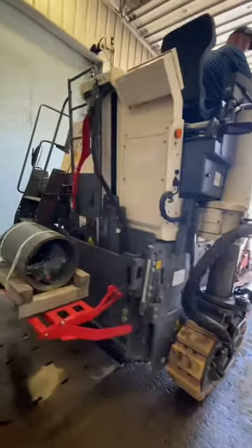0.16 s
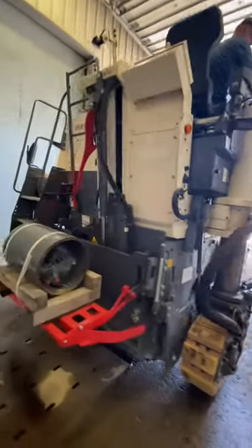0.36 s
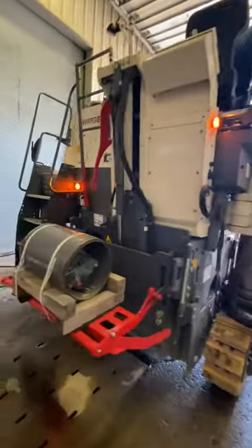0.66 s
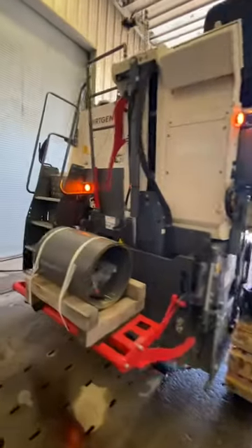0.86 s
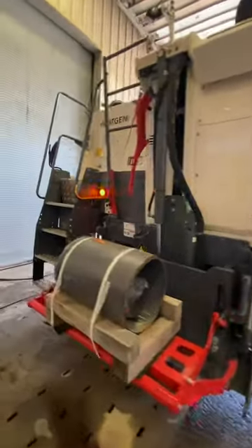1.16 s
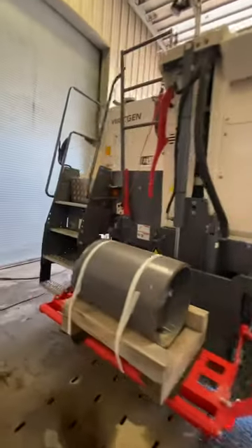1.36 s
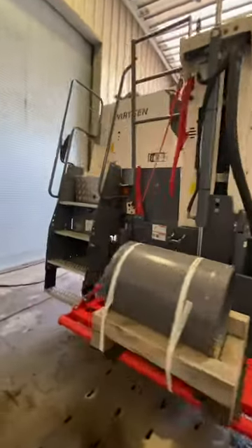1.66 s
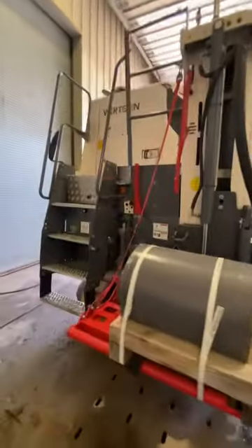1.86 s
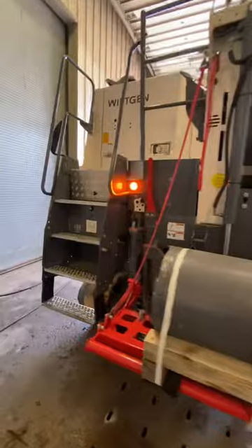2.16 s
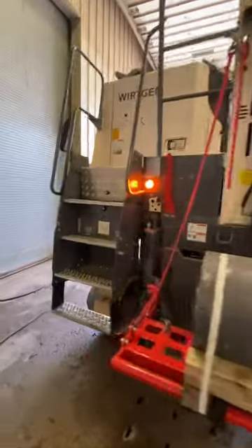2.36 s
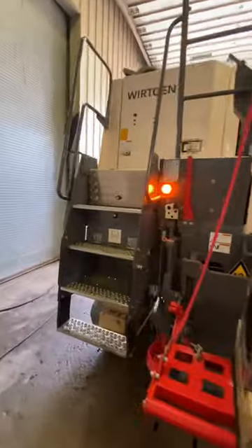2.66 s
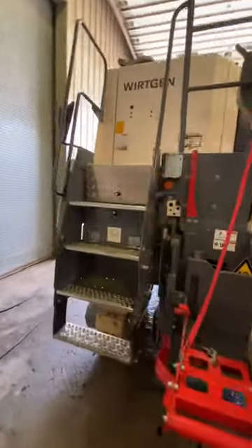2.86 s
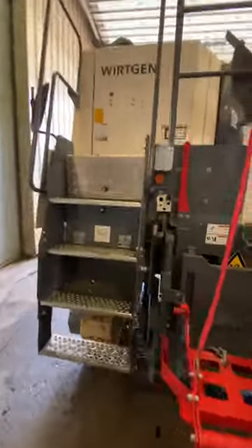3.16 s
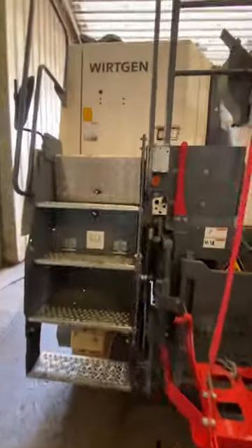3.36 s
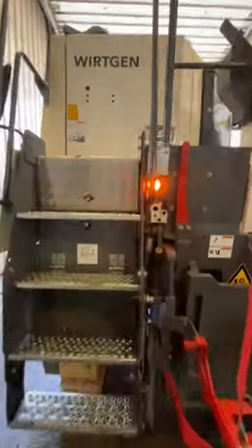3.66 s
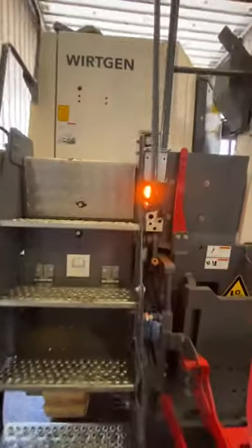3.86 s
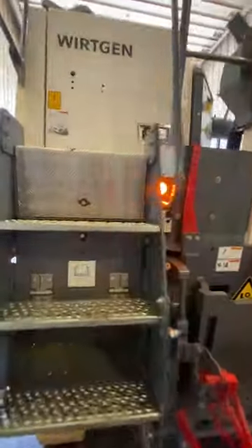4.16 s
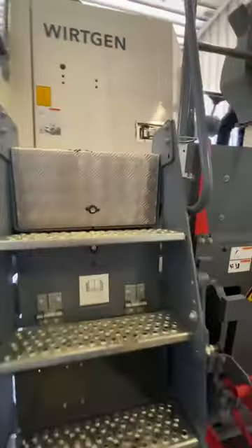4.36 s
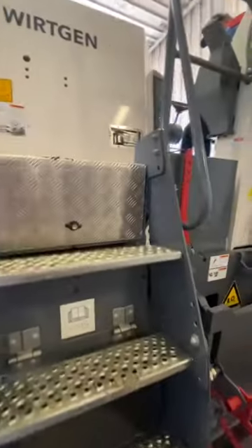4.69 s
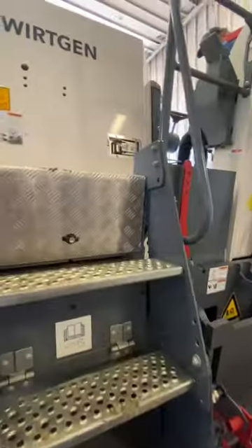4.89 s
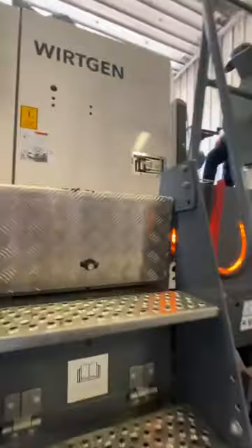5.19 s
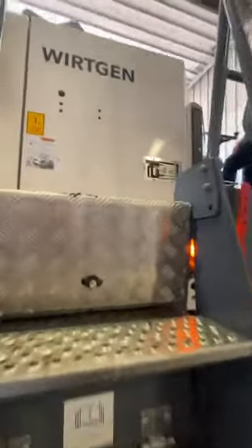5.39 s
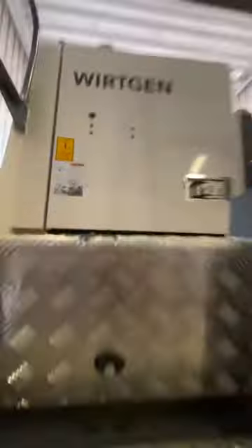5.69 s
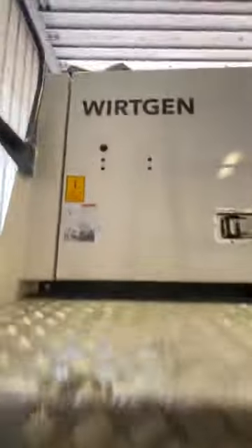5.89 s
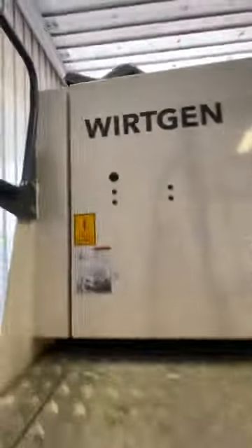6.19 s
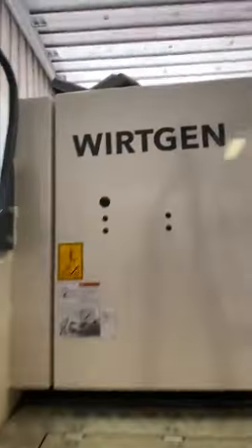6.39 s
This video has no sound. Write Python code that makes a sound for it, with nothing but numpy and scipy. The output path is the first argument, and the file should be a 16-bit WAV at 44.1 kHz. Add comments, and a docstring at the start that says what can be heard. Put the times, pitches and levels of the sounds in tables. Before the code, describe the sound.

The steady low drone of a heavy diesel machine swells as it gets closer indoors, and a metal step rattles briefly.

```python
"""A big six-cylinder diesel idles in a steel-walled bay, heard from a phone carried up close to it.
Firing, cooling-fan and hydraulic-pump tones swell and sink as the two microphones cross the bay's
standing waves. Under them is a roar of valves, injectors and air that partly repeats each engine cycle.
On the way in something ticks near the phone; later a metal step is knocked and rattles briefly."""
import sys
import numpy as np
from scipy import signal
from scipy.fft import rfft, irfft
from scipy.io import wavfile
from scipy.ndimage import uniform_filter1d

SR = 44100
rng = np.random.default_rng(int(sys.argv[2]) if len(sys.argv) > 2 else 0)


def unload_wav(signal):
    """Save mono or channel-first audio to the path in sys.argv[1] as 16-bit WAV at rate SR, clipped to [-1, 1]."""
    wavfile.write(
        sys.argv[1],
        SR,
        np.round(np.clip(np.atleast_2d(signal).T, -1, 1) * 32767).astype(np.int16),
    )


N = 288414

# gain on the way up to the machine: t/s, level/dB
APPROACH_GAIN = [(0, 0), (1.8, 1), (3, 3.5), (4.2, 5.5), (5.4, 8), (6, 9), (6.54, 9)]
# the step strikes its frame: t/s, level/dB, softness/(dB per octave)
STEP_CONTACTS = [(5.0052, 0, 2), (5.0089, -2, 0), (5.0145, -11, 0), (5.0195, -4, 8), (5.030, -11, 5),
                 (5.0355, -10, 7)]
# modes of the step: f/Hz, relative level/dB, t60/s
STEP_RESONANCES = [(2250, 0, .02), (2480, 0, .03), (2680, -4, .03), (3250, -5, .015), (3900, -6, .015),
                   (4700, -10, .025), (5400, -1, .03), (6700, -11, .025), (8600, -8, .045),
                   (10100, -22, .025)]
# mid colour of the roar as the phone records it, almost empty from 8.8 to 12 kHz,
# with a faint hiss near 14 kHz: f/Hz, relative level/dB
MID_COLOUR = [(20, -78), (64, -49.5), (105, -39.5), (240, -40), (600, -51), (1100, -50.5), (1250, -53.5),
              (2700, -59.5), (2950, -64), (3500, -68.5), (6200, -74), (8200, -86), (8800, -113),
              (12000, -113), (14000, -101)]
# side colour of the roar as the phone records it: f/Hz, relative level/dB
SIDE_COLOUR = [(20, -85.5), (45, -90.5), (100, -66.5), (210, -60), (480, -57.5), (1060, -56.5),
               (1700, -64.5), (2500, -56.5), (3500, -64), (6000, -71), (6500, -76.5), (10000, -78.5),
               (12500, -83), (15500, -111)]
# ringing enclosure panels and a null of the bay's air: f/Hz, width/Hz, lift/dB
PANEL_RESONANCES = [(130, 17, -6.5), (496, 38, 5.5), (659, 81, 2.5), (835, 120, 3.5), (1045, 45, 4.5),
                    (1500, 170, 3), (2707, 120, 4.5), (4740, 780, 0), (5960, 640, 5.5)]
# share of the side that follows the mid: f/Hz, in phase, a quarter cycle ahead
MIC_LINK = [(90, 0.41, -0.46), (220, 0.36, -0.64), (330, -0.11, -0.34), (460, -0.00013, 0.06),
            (790, 0.53, 0.04), (1330, 0.38, 0.33), (1910, 0.13, 0.78), (3500, -0.074, 0.38),
            (4500, 0.064, 0.2), (5000, -0.045, -0.2), (5500, -.2, 0.63), (7500, -.08, 0.49),
            (9000, 0.2, 0.1)]
# shares of the roar's power that repeat: f/Hz, each cycle, each third of a cycle
REPEAT_SHARES = [(60, 0.19, 0), (300, 0.2, 0.11), (1030, 0.41, 0.02), (2340, 0.1, 0.09), (2620, 0.04, 0.6),
                 (2900, 0.03, 0.08), (6000, 0.06, 0)]
# loud spots of the standing waves: t/s, f/Hz, rms level/dB before the approach gain, spread/s
LOUD_SPOTS = [(0, 325.8, -41.5, 0.61), (.12, 250.7, -34, 0.78), (1.1, 250.4, -44, 0.65),
              (.5, 116.2, -36.5, 0.25), (.9, 102, -41, 0.26), (1.64, 250, -36.5, 0.18),
              (1.64, 232, -41, 0.18), (1.71, 149.2, -35.5, 0.36), (1.93, 484.7, -45.5, 0.33),
              (2.21, 161.9, -40.5, 0.94), (2.21, 173.8, -44.5, 0.52), (1.0, 49.6, -60, .6),
              (2.8, 50.4, -53.5, 1.3), (2.45, 232, -46, 0.1), (2.82, 483, -45, 0.14),
              (3.01, 326.7, -46.5, 0.18), (3.25, 115.5, -38, 1.08), (3.3, 809, -46, 0.087),
              (3.31, 100, -45, .57), (3.74, 246, -49.5, 0.13), (3.98, 231.2, -36, 0.2),
              (3.98, 377, -48.5, 0.4), (4.06, 161, -46, 0.09), (4.32, 150, -43, .17), (4.35, 402, -42, .35),
              (4.7, 408.7, -49.5, 0.55), (5, 504.5, -51.5, 0.38), (5.2, 33.4, -71, .4),
              (4.51, 324.7, -44.5, 0.32), (4.71, 375.3, -42.5, 0.2), (5.25, 488.2, -41.5, .33),
              (5.15, 201.1, -36.5, 0.33), (5.17, 150.3, -40, 0.3), (5.2, 174.1, -36, 0.64),
              (5.38, 162.4, -40, .52), (5.3, 406.6, -45, 0.44), (5.8, 91.8, -48.5, .8),
              (5.5, 100.5, -43, 0.97), (5.61, 374.1, -36, 0.16), (5.7, 251, -49.5, 0.23),
              (5.9, 202.5, -52, 0.1), (6.46, 116.5, -32.5, 0.56)]

# orders of each source, and their mid rms level/dB from afar, between loud spots
ENGINE_ORDERS = (4, 6, 9, 12, 18, 21, 24, 30, 36, 45, 48, 49, 60)
ENGINE_DB = (-75, -60.5, -56.5, -53, -46.5, -60, -45.5, -49, -52.5, -49.5, -57.5, -60.5, -56.5)
FAN_ORDERS, FAN_DB = (3, 4, 5, 9, 10), (-58, -53.5, -39, -49, -42)
PUMP_ORDERS, PUMP_DB = (1, 2, 3, 5), (-46, -46.5, -58.5, -55)
CYCLE_HZ, FAN_SHAFT_HZ, PUMP_PISTON_HZ = 8.3555, 23.144, 162.1
ROAR_LOW_DB, ROAR_BRIGHT_DB = -30.5, -37  # from afar
TIME_S, BIN_HZ = np.arange(N) / SR, np.fft.rfftfreq(N, 1 / SR)


def undb(db):
    """Gain of a level in dB."""
    return 10 ** (np.asarray(db) / 20)


def per_bin(table, column=1):
    """A table column at every spectrum bin, interpolated over log frequency."""
    rows = np.array(table)
    return np.interp(np.log(BIN_HZ + 1), np.log(rows[:, 0]), rows[:, column])


def drift(rate_hz):
    """Random levels held for 1 / rate_hz s and smoothed twice; spread near 1."""
    hold = int(SR / rate_hz)
    steps = np.repeat(rng.standard_normal(N // hold + 1), hold)
    return 1.327 * uniform_filter1d(uniform_filter1d(steps, hold), hold)[:N]


def decay(start_s, t60):
    """Silent until start_s, then falling 60 dB every t60 s."""
    age = TIME_S - start_s
    return (age > 0) * np.exp(-np.log(1000) * np.maximum(age, 0) / t60)


def filtered(x, order, edges_hz, kind):
    """Butterworth filter."""
    return signal.sosfilt(signal.butter(order, edges_hz, kind, fs=SR, output="sos"), x)


def near_tick():
    """A thin bright tick close to the phone, alike at both microphones."""
    hiss = filtered(rng.standard_normal(N), 1, 6000, "high")
    return undb(-34) * decay(start_s=2.1809, t60=.002) * hiss


def step_rattle():
    """Left and right: each contact with the frame rings the metal step unevenly under a gritty rasp."""
    mic_lead_s = np.array([[0], [5.5e-5]])  # puts the top modes in opposite phase
    lowest_hz = STEP_RESONANCES[0][0]
    grit = rng.standard_normal((2, N))
    ring = rasp = 0
    for start_s, strength_db, softness in STEP_CONTACTS:
        age = TIME_S - start_s
        blow = undb(strength_db) * np.clip(age / .002, 0, 1)  # builds over 2 ms
        rasp += blow * decay(start_s, t60=.035)
        for hz, db, t60 in STEP_RESONANCES:
            gain = undb(db + 1.7 * rng.standard_normal() - softness * np.log2(hz / lowest_hz))
            ring += blow * gain * decay(start_s, t60) * np.sin(2 * np.pi * hz * (age + mic_lead_s))
    mid = filtered(rasp * grit[0], 10, [2000, 8000], "band")
    mid += undb(-14) * filtered(rasp * grit[0], 10, 12500, "high")
    side = filtered(rasp * grit[1], 2, [2000, 9000], "band")
    return undb(-21.5) * ring + undb(-28.5) * np.array([mid + side, mid - side])


def approach_db():
    """The level rises as the distance to the machine closes."""
    return np.interp(TIME_S, *np.transpose(APPROACH_GAIN))


def roar_colour():
    """The roar's colour as the phone records it: mid gain, side gain and their complex link, per bin."""
    lift_db = sum(db / (1 + (2 * (BIN_HZ - hz) / width) ** 2) for hz, width, db in PANEL_RESONANCES)
    mid_gain = undb(per_bin(MID_COLOUR) + lift_db)
    side_gain = undb(per_bin(SIDE_COLOUR) + lift_db)
    link = per_bin(MIC_LINK) + 1j * per_bin(MIC_LINK, column=2)
    return mid_gain, side_gain, link / np.maximum(abs(link), 1)


def standing_wave(tone_hz, between_db):
    """A tone's rms along the way in: a steady part plus a swell at each loud spot the phone crosses."""
    swells = sum(undb(db) * np.exp(-.5 * ((TIME_S - at_s) / spread_s) ** 2)
                 for at_s, hz, db, spread_s in LOUD_SPOTS if abs(hz / tone_hz - 1) < .008)
    return (undb(between_db) + swells) * undb(approach_db())


def repeating_noise(hz, memory):
    """Flat noise in which each period keeps a share of the one before."""
    period, settling = round(SR / hz), 60
    fresh = rng.standard_normal((settling + N // period + 1, period))
    periods = signal.lfilter([np.sqrt(1 - memory ** 2)], [1, -memory], fresh, axis=0)
    return periods[settling:].ravel()[:N]


def clatter_spectrum():
    """Flat noise: valves repeat each cycle, injector knock thrice a cycle, air and echoes never."""
    valve_share = np.clip(per_bin(REPEAT_SHARES), 0, 1)
    knock_share = np.clip(per_bin(REPEAT_SHARES, column=2), 0, 1 - valve_share)
    knock = np.sqrt(knock_share) * rfft(repeating_noise(3 * CYCLE_HZ, memory=.938))
    valves = np.sqrt(valve_share) * rfft(repeating_noise(CYCLE_HZ, memory=.905))
    air = np.sqrt(1 - valve_share - knock_share) * rfft(rng.standard_normal(N))
    return valves + knock + air


def engine_roar():
    """Mid and side clatter in the bay; five bands grow as the phone nears, each flickering alone."""
    mid_gain, side_gain, link = roar_colour()
    direct = clatter_spectrum()
    unlinked = np.sqrt(1 - abs(link) ** 2) * clatter_spectrum()
    spectra = np.array([mid_gain * direct, side_gain * (link * direct + unlinked)])
    lowpasses = [1 / (1 + (BIN_HZ / edge_hz) ** order)
                 for edge_hz, order in ((550, 4), (1200, 8), (2300, 12), (3200, 12))]
    band_masks = np.diff(lowpasses, axis=0, prepend=0, append=1)
    low, *uppers = irfft(spectra * band_masks[:, None], N)
    low_rise_db, *upper_rises_db = (share * approach_db() for share in (.97, .94, 1, .94, .91))
    bright = sum(band * undb(rise_db + flicker_db * drift(9))
                 for band, rise_db, flicker_db in zip(uppers, upper_rises_db, (.9, .9, 1.6, .7)))
    bright *= undb(ROAR_BRIGHT_DB) / np.std(sum(uppers)[0])
    low *= undb(ROAR_LOW_DB + low_rise_db + .91 * drift(7.3)) / np.std(low[0])
    return low + bright


def shaft_tones(base_hz, orders, levels_db, waver, flutter_db):
    """Mid and side orders of one shaft whose speed wavers; each order flutters alone."""
    mid_gain, side_gain, link = roar_colour()
    side_ratio = side_gain / mid_gain * link * undb(3)
    phase = 2 * np.pi * np.cumsum(base_hz * (1 + waver * drift(2))) / SR
    pair = 0
    for order, db in zip(orders, levels_db):
        hz = order * base_hz
        amplitude = np.sqrt(2) * standing_wave(hz, db) * undb(flutter_db * drift(6))
        tone = amplitude * np.exp(1j * (order * phase + 2 * np.pi * rng.random()))
        pair += np.real([tone, tone * side_ratio[int(hz * N / SR)]])
    return pair


def diesel_hum():
    """Mid and side tones of the firing cylinders, the cooling fan and the hydraulic pump's pistons."""
    firing = shaft_tones(CYCLE_HZ, ENGINE_ORDERS, ENGINE_DB, waver=.0004, flutter_db=.94)
    fan = shaft_tones(FAN_SHAFT_HZ, FAN_ORDERS, FAN_DB, waver=.00199, flutter_db=1.7)
    pump = shaft_tones(PUMP_PISTON_HZ, PUMP_ORDERS, PUMP_DB, waver=.00117, flutter_db=.64)
    return firing + fan + pump


def scene():
    """The machine, the step and the tick in the left and right channels."""
    mid, side = engine_roar() + diesel_hum()
    return np.array([mid + side, mid - side]) + step_rattle() + near_tick()


def record(dry):
    """The phone cuts off steeply above 15.4 kHz."""
    return signal.sosfilt(signal.ellip(10, .2, 80, 15400, fs=SR, output="sos"), dry)


dry = scene()
out = record(dry)
unload_wav(out)
```